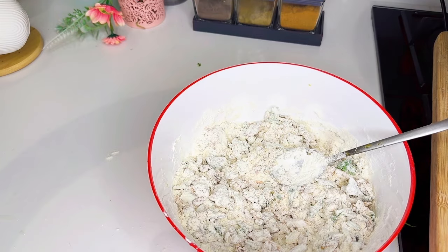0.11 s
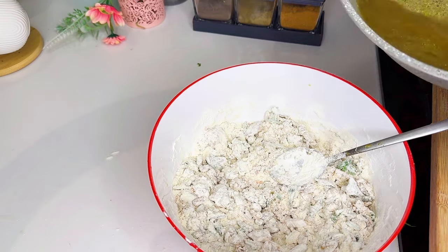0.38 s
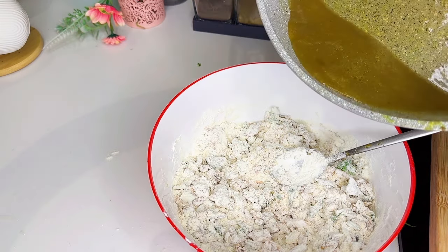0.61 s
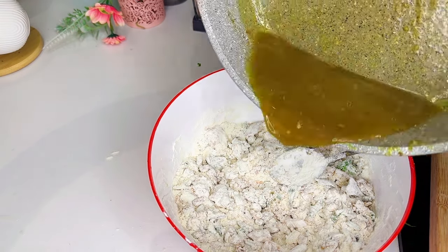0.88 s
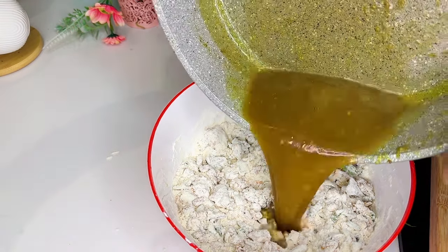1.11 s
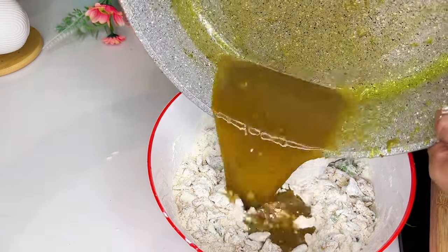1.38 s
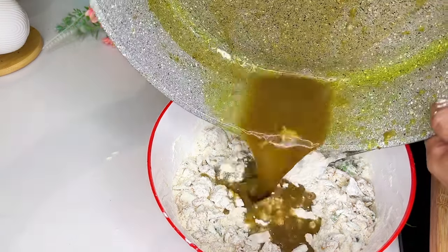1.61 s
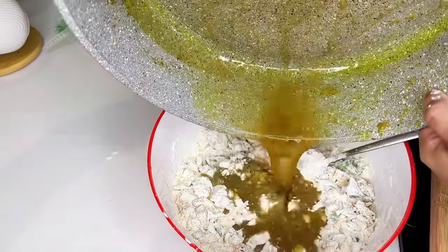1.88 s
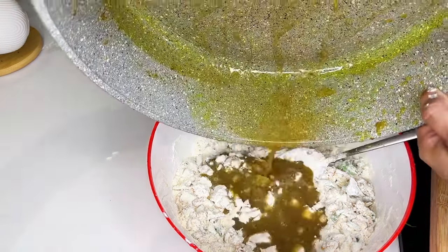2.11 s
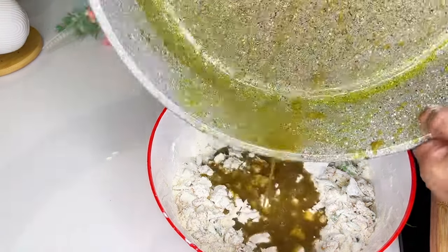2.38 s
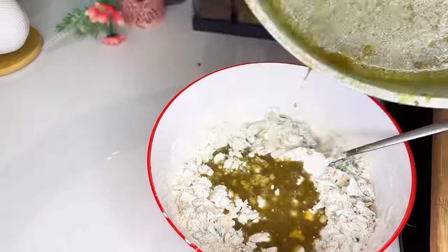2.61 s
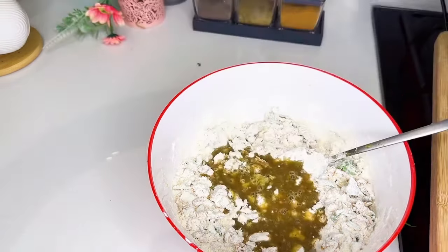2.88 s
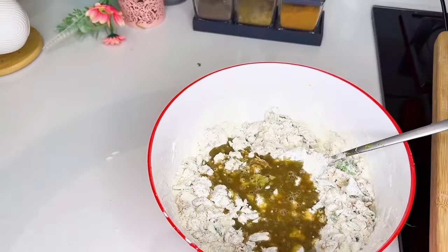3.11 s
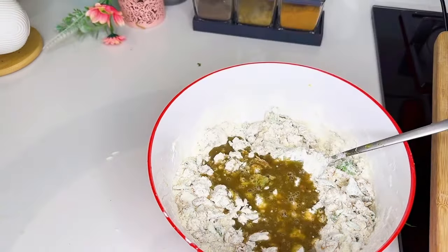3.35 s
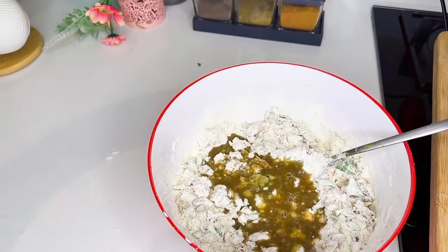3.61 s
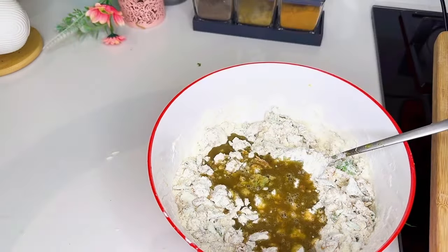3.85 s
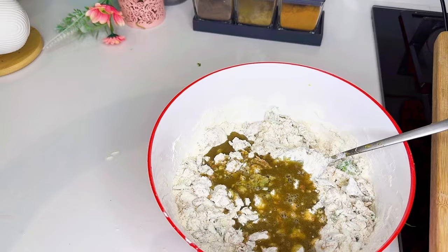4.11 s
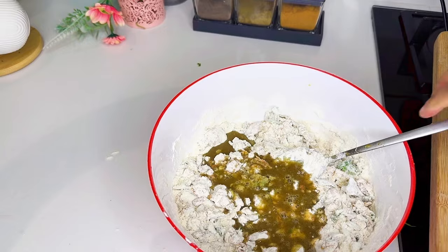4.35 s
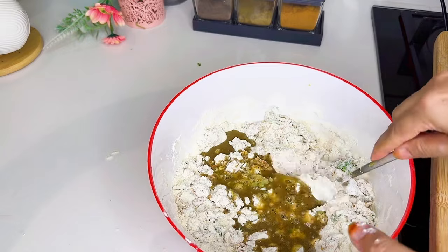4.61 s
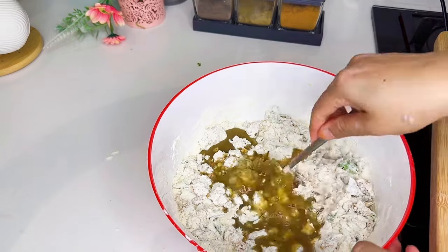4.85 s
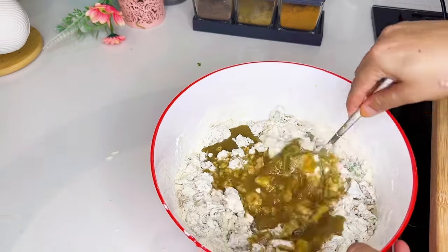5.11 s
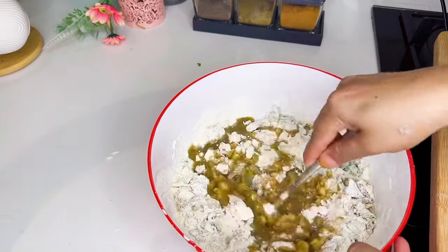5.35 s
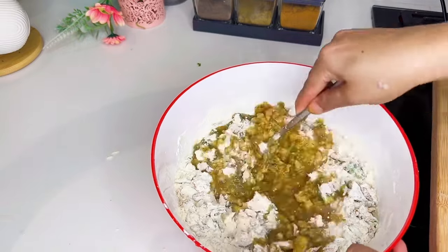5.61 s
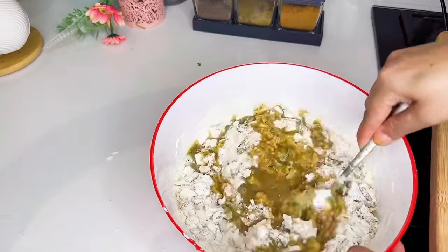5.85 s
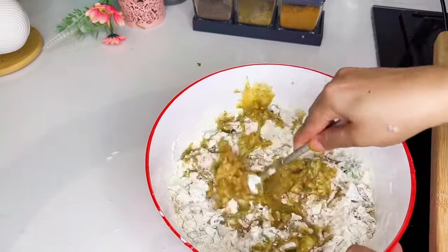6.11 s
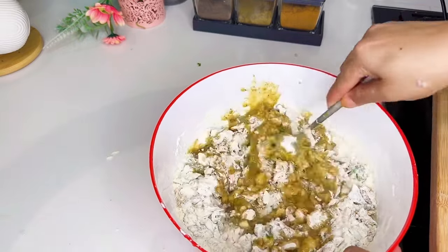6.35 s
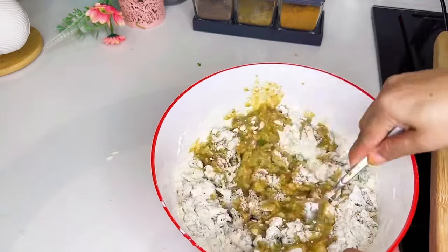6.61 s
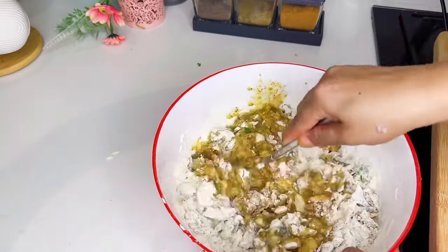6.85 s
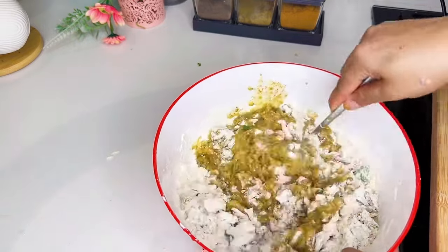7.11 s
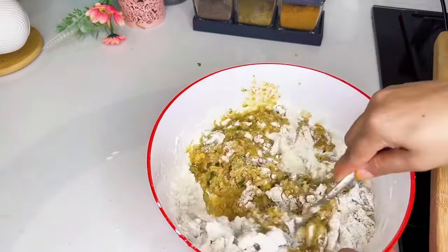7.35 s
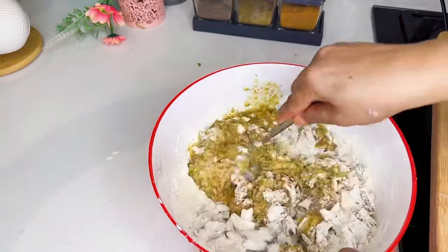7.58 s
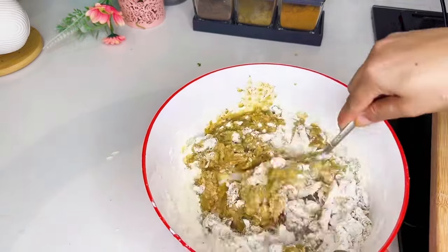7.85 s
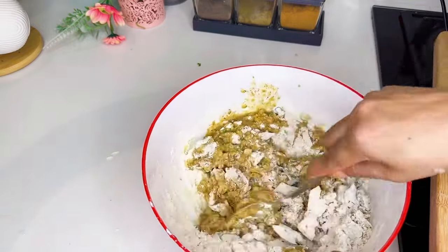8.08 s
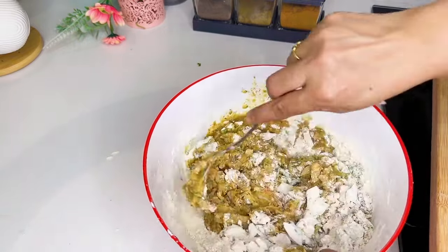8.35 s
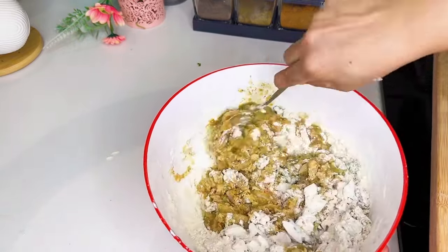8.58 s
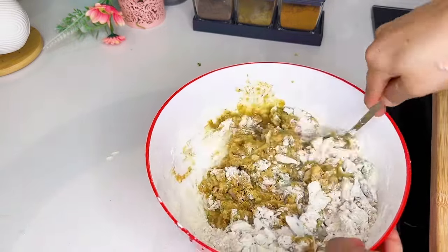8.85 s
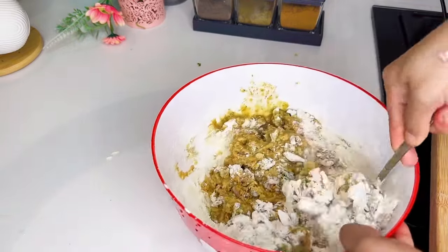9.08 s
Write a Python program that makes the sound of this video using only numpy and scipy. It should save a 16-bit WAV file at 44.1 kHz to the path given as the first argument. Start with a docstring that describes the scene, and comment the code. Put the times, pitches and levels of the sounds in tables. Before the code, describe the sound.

In a small hard-surfaced kitchen with a faint low appliance hum, liquid pours briefly into a bowl of crumbs with fine spatter, splats and little gurgles, thinning to drips. A heavy pan then clangs and rocks on a stovetop, much the loudest event. Afterwards a spoon stirs a sticky mix close to the microphone, squelching, scraping and snapping, with hollow knocks on the plastic bowl.

```python
"""First a kitchen hush with an appliance's hum; then thick broth is poured from a pan onto crumbs in a bowl.
The empty pan is set down on the hob and rocks; then a spoon turns the wet mix and knocks the plastic bowl.
Hum is wavering sines; liquid is many small bubbles and puffs of noise; the pan is a set of dying sines.
The bowl is noise through resonances. A small hard room answers the pouring, the pan and the spoon."""
import sys
import numpy as np
from scipy import signal
from scipy.fft import rfft, irfft, next_fast_len
from scipy.io import wavfile
from scipy.ndimage import map_coordinates

SR = 44100
rng = np.random.default_rng(int(sys.argv[2]) if len(sys.argv) > 2 else 0)


def inscribe(sig):
    """Save sig as 16-bit PCM at rate SR to the path in sys.argv[1].

    A 1-D sig is mono; a 2-D sig holds one channel per row.
    Samples are clipped to [-1, 1] before scaling.
    """
    pcm = np.round(np.clip(np.atleast_2d(sig).T, -1, 1) * 32767)
    wavfile.write(sys.argv[1], SR, pcm.astype(np.int16))


def undo_db(level):
    """Turn decibels back into plain size, where 20 dB means ten times bigger."""
    steps = np.asarray(level, float) / 20
    return 10 ** steps


N = 406373  # length in samples


def unit(x):
    """Scale to an rms of 1."""
    return x / np.sqrt(np.mean(x ** 2) + 1e-20)


def along(points, hz):
    """Read a curve of (frequency, value) points on a log frequency axis."""
    point_hz, value = np.transpose(points)
    return np.interp(np.log(hz + 1), np.log(point_hz + 1), value)


def levels(rows):
    """Turn each dB column into a gain per sample, at -120 dB outside the table."""
    seconds, *columns = np.transpose(rows)
    t = np.arange(N) / SR
    return [undo_db(np.interp(t, seconds, db, left=-120, right=-120)) for db in columns]


def filtered(x, response):
    """Filter x by multiplying its spectrum with a response given as a function of frequency."""
    size = 2 * next_fast_len(len(x) // 2 + SR // 8)  # spare room for the ringing
    spectrum = rfft(x, size) * response(np.fft.rfftfreq(size, 1 / SR))
    return irfft(spectrum, size)[:len(x)]


def resonances(modes):
    """Response of an object that favours a few pitches: (frequency, width, level) with alternating signs."""
    def response(hz):
        total = 0
        for k, (centre, width, db) in enumerate(modes):
            damping = 1j * hz * width
            total = total + (-1) ** k * undo_db(db) * damping / (centre * centre - hz * hz + damping)
        return total
    return response


def causal(spectrum):
    """Minimum-phase response of a (frequency, level) curve, so that nothing sounds before the blow."""
    def response(hz):
        cepstrum = irfft(np.log(undo_db(along(spectrum, hz))))
        half = len(cepstrum) // 2
        folded = np.r_[cepstrum[0], 2 * cepstrum[1:half], np.zeros(len(cepstrum) - half)]
        return np.exp(rfft(folded))
    return response


def coloured(x, spectrum):
    """Give x the tone colour of a (frequency, level) curve, at an rms of 1."""
    return unit(filtered(x, lambda hz: undo_db(along(spectrum, hz))))


def wobble(rate):
    """A smooth random curve with `rate` random points a second."""
    points = rng.standard_normal(int(N * rate / SR) + 4)
    return map_coordinates(points, [np.arange(N) * rate / SR])


def add(track, s, sound):
    """Mix a sound into the track at time s."""
    part = track[round(s * SR):][:len(sound)]
    part += sound[:len(part)]


def crackle(per_second, spread_db, life, bed):
    """Noise puffs at random times and of scattered size, each dying over `life` seconds, on a steady bed."""
    starts = rng.random(N) < per_second / SR
    sizes = starts * undo_db(spread_db * np.clip(rng.standard_normal(N), -2, 2))
    envelope = signal.lfilter([1], [1, -np.exp(-1 / (life * SR))], sizes)
    return (unit(envelope) + bed) * rng.standard_normal(N)


def puff(t60, colour):
    """One blow: a click, then noise that falls 60 dB in t60 seconds, filtered; peak 1."""
    t = np.arange(2048) / SR
    click = 2.35 * (t == 0)
    burst = filtered((rng.standard_normal(len(t)) + click) * undo_db(-60 * t / t60), colour)
    return burst / np.abs(burst).max()


def bubble(hz, cycles):
    """An air bubble: a soft-starting sine of a few cycles whose pitch climbs slightly."""
    u = np.arange(512) / SR * hz / cycles  # time, 1 at the loudest moment
    swell = np.e * u * np.exp(-u)
    return swell * np.sin(2 * np.pi * cycles * u * (1 + 0.012 * (u - 1)))


def swarm(span, count, low_hz, octaves, cycles, spread_db):
    """Many bubbles of scattered time, pitch and size, at an rms of 1 over their span."""
    out, (start, end) = np.zeros(N), span
    for when, pitch, size in rng.random((count, 3)):
        one = bubble(low_hz * 2 ** (octaves * pitch), cycles)
        add(out, start + when * (end - start), undo_db(spread_db * size) * one)
    return unit(out) * np.sqrt((end - start) * SR / N)


def ringing(modes, tilt_db):
    """Metal struck once: all its modes die away, each at a slightly random strength."""
    t = np.arange(SR // 2) / SR
    ring = np.zeros(len(t))
    for (hz, db, t60), chance_db in zip(modes, rng.normal(0, 1.5, len(modes))):
        start_db = db + chance_db + tilt_db * np.log2(hz / 1000)
        ring += undo_db(start_db - 60 * t / t60) * np.sin(2 * np.pi * hz * t)
    return ring * (1 - np.exp(-t / 0.00099))  # rounds off the very start


# colour of the hush in the room: (frequency [Hz], relative level [dB per Hz])
HUSH_COLOUR = [(15, -62), (25, -47), (49, -5), (102, -14), (134, -14), (236, -12), (256, -14), (326, -13),
               (624, -22), (677, -24.5), (2160, -33.5), (2480, -36.5), (3720, -38), (4870, -44.5),
               (16000, -48)]
# steady notes of the appliance's hum: (frequency [Hz], relative level [dB])
HUM = [(65.1, -61.5), (97.7, -58.5), (130.3, -53), (173.6, -58.5)]
# thin bands of appliance whine: (frequency [Hz], width [Hz], middle level [dB rms])
WHINE = [(2640, 160, -79.5), (3630, 450, -73.5)]


def room_tone():
    """Broad hush, a slightly wavering hum and two thin bands of noise as whine."""
    t = np.arange(N) / SR
    out = undo_db(-55) * coloured(rng.standard_normal(N), HUSH_COLOUR)
    for hz, db in HUM:
        gain = undo_db(db + 2 + 1.74 * wobble(6))
        out += gain * np.sin(2 * np.pi * hz * t + 0.82 * wobble(2.7))
    for hz, width, db in WHINE:
        band = unit(filtered(rng.standard_normal(N), resonances([(hz, width, 0)])))
        out += undo_db(db + 2.9 * wobble(8.1)) * band
    return out


# how long the room rings: (frequency [Hz], time to fall 60 dB [s])
KITCHEN = [(100, 0.81), (500, 0.95), (2000, 0.91), (6000, 0.79), (14000, 0.6)]


def kitchen(x):
    """The room's answer is a noise tail in which each frequency dies at its own speed."""
    hz, t, noise = signal.stft(rng.standard_normal(SR), SR, nperseg=256)
    fade = undo_db(-60 * t / along(KITCHEN, hz)[:, None])
    tail = signal.istft(noise * fade, SR, nperseg=256)[1]
    late = np.pad(x, (200, 0))  # the answer starts 200 samples after the sound
    return signal.fftconvolve(late, tail / np.linalg.norm(tail))[:N]


# colour of bright fizz, also used by the stirring: (frequency [Hz], relative level [dB per Hz])
FIZZ = [(3000, -12), (6000, -2), (15500, -1.5)]


def rustle():
    """A faint bright hiss swells and fades as the pan is carried off."""
    swell = np.exp(-((np.arange(N) / SR - 3.3) / 0.17) ** 2)
    return undo_db(-69) * swell * coloured(rng.standard_normal(N), FIZZ)


# colour of the fine spatter: (frequency [Hz], relative level [dB per Hz])
SPATTER = [(2940, -29), (5000, -22), (6130, -27), (7550, -5), (15500, 10.5)]
# strength of the stream: (time [s], relative level [dB])
FLOW = [(1.0, -75), (1.11, -64), (1.3, -65.5), (1.52, -61), (1.64, -67), (1.68, -70), (1.78, -52.5),
        (1.9, -63), (2.05, -64), (2.5, -60.5), (2.7, -76)]
# drops landing: (time [s], splat peak level [dB], bubble pitch [Hz], bubble level [dB])
DROPS = [(1.06, -46, 4150, -51), (1.1177, -39, 5600, -40), (1.192, -46, 3520, -61),
         (1.2184, -45, 1900, -59), (1.244, -41, 3020, -60), (1.3633, -39.5, 3860, -54),
         (1.4159, -34.5, 5100, -42), (1.465, -39, 4600, -47), (1.493, -32.5, 2860, -49),
         (1.5205, -37.5, 3230, -40), (1.5564, -41, 3280, -46), (1.6608, -38, 3270, -43),
         (1.6721, -22, 5500, -49), (1.7295, -41, 2780, -46), (1.758, -27, 4350, -37),
         (1.7877, -34, 4160, -53), (1.8033, -29, 4220, -38.5), (1.866, -37, 4600, -49),
         (1.895, -38, 4900, -41), (1.919, -29, 4930, -58), (2.0018, -42.5, 4320, -66),
         (2.0897, -41.5, 3170, -68), (2.2953, -47, 2200, -59), (2.33, -45, 3580, -66),
         (2.396, -46, 2610, -61), (2.4632, -37, 2890, -49.5), (2.503, -42, 3570, -66),
         (2.5845, -47, 1530, -66)]
# heavy slaps that also sound the bowl: (time [s], starting level [dB])
SLAPS = [(1.672, -35.5), (1.73, -40.5)]


def pour():
    """Fine spatter and a gurgle of bubbles follow the stream; larger drops splat and trap a bigger bubble."""
    flow, = levels(FLOW)
    start, end = FLOW[0][0], FLOW[-1][0]
    # around 1.88 s the stream breaks into drips and stops gurgling
    unbroken = 1 / (1 + np.exp((np.arange(N) / SR - 1.88) / 0.05))
    spatter = coloured(crackle(140, spread_db=16, life=0.0012, bed=0.53), SPATTER)
    gurgle = swarm((start, end), count=800, low_hz=2430, octaves=1.23, cycles=1.8, spread_db=14)
    out = undo_db(0.5) * flow * spatter + undo_db(2) * flow * unbroken * gurgle
    for s, splat_db, hz, bubble_db in DROPS:
        # smaller drops as the pan empties: splats brighten by 0.79 octaves a second
        splat_hz = 6740 * 2 ** (0.79 * (s - start))
        splat = puff(0.021, resonances([(splat_hz, 0.78 * splat_hz, 0), (2000, 2500, -8)]))
        add(out, s, undo_db(splat_db) * splat)
        add(out, s, undo_db(bubble_db) * bubble(hz, cycles=4.6))
    t = np.arange(1800) / SR
    for s, db in SLAPS:
        add(out, s, undo_db(db - 60 * t / 0.033) * np.sin(2 * np.pi * 740 * t))
    return out


# pan touching the hob:
# (time [s], clang peak level [dB], pan ring level [dB], grate ring level [dB], brightness [dB per octave])
LANDINGS = [(3.570, -10.5, -53, -18, 1), (3.586, -13.5, -35, -30, -2.5), (3.716, -4.5, -17, -26, -1.5),
            (3.755, -6, -23.5, -21.5, -3), (3.765, -15, -30, -37, -1), (3.800, -4, -23.5, -27, 2.5),
            (3.832, -12.5, -28.5, -40, 0)]
# notes of the pan: (frequency [Hz], relative level [dB], time to fall 60 dB [s])
PAN = [(550.4, -5.5, 0.32), (574, -0.5, 0.34), (833, -6, 0.11), (966, -3.5, .18), (1434, -2, .1),
       (1700, -8, 0.35), (2223, -9.5, 0.14), (2519, -9, .25), (2850, -10, .15), (3488, -14, .2),
       (4500, -7, 0.069), (5130, -16, .2), (6460, -23, .3), (7410, -29.5, .3)]
# notes of the iron grate under it: (frequency [Hz], relative level [dB], time to fall 60 dB [s])
GRATE = [(599, -3, 0.32), (1043, 4.5, 0.059), (1095, 0.5, 0.12), (1395, 0.5, .07), (2092, -4, 0.32),
         (2680, -7.5, .06), (3050, -15.5, .3), (3875, -6, .12), (4650, -18.5, .13), (5810, -25, 0.33),
         (7811, -29, 0.32), (8600, -30, 0.25), (9200, -30, .25), (10200, -34.5, .2)]
# colour of the clang, before brightness: (frequency [Hz], relative level [dB per Hz])
CLANG = [(100, -26.5), (300, -13), (1000, 1), (3000, -6.5), (6000, -16.5), (16000, -38.5)]


def pan():
    """Each contact rings pan and grate, clangs as a noise burst, and thuds into the hob as low sines."""
    out, t = np.zeros(N), np.arange(SR // 2) / SR
    thud = sum(level * np.sin(2 * np.pi * hz * t) for hz, level in [(81, 1), (50, 0.86), (172, 0.53)])
    thud = thud * (1 - np.exp(-t / 0.011))  # soft start
    for s, clang_db, pan_db, grate_db, tilt_db in LANDINGS:
        add(out, s, undo_db(pan_db) * ringing(PAN, tilt_db) + undo_db(grate_db) * ringing(GRATE, tilt_db))
        clang = [(hz, db + tilt_db * np.log2(hz / 1000)) for hz, db in CLANG]
        add(out, s, undo_db(clang_db) * puff(0.067, causal(clang)))
        thud_db = clang_db - 12 + 0.5 * tilt_db  # hard bright contacts carry more weight
        add(out, s, undo_db(thud_db - 60 * t / 0.13) * thud)
    return out


# single drags of the spoon, a minus fade swapping rise and fade:
# (time of peak [s], scrape level [dB], time to fade by 20 dB [s], wet fizz against scrape [dB])
DRAGS = [(4.44, -68, 0.26, -1), (4.7, -58, 0.02, -8), (4.85, -48.5, 0.05, -10), (4.96, -62, 0.08, 2),
         (5.251, -49, 0.03, -10), (5.378, -53, .1, -2.5), (5.53, -55.5, 0.06, -2.5),
         (5.629, -46, 0.0453, -5), (5.759, -49, 0.03, -7.5), (5.91, -60.5, 0.25, -1.5),
         (6.15, -63.5, 0.16, -5), (6.355, -51, 0.01, -9), (6.455, -44, 0.04, -11.5), (6.55, -45, 0.05, -9),
         (6.74, -50, 0.11, -8.5), (6.868, -42.5, 0.06, -12), (7.12, -46.5, 0.05, -11.5),
         (7.24, -45, 0.1, -9), (7.491, -49, 0.1, -3.5), (7.63, -44, 0.1, -8.5), (7.91, -40.5, -0.01, -17),
         (8.06, -48, 0.1, -6), (8.52, -57, 0.2, -2.5), (9.18, -52, 0.17, -13)]


def drags():
    """Gains of scrape and of wet fizz: every drag of the spoon swells and fades."""
    s, db, fade, wet_db = np.transpose(DRAGS)[:, :, None]
    t = np.arange(0, N + 64, 64) / SR
    # the rise takes 0.67 of the fade time; the power 1.44 rounds the top of the swell
    away = np.maximum((t - s) / fade, (s - t) / (0.67 * fade))
    scrape = undo_db(db - 20 * away ** 1.44)
    fizz = scrape * undo_db(wet_db)
    return [np.interp(np.arange(N) / SR, t, gain.sum(axis=0)) for gain in (scrape, fizz)]


# effort of the hand, heard as steady churning: (time [s], relative level [dB])
EFFORT = [(4.35, -68), (4.75, -67), (5.0, -68.5), (5.15, -65.5), (5.8, -67), (6.05, -55), (6.3, -66.5),
          (6.9, -59), (7.05, -60), (7.3, -56.5), (7.45, -66), (7.8, -61), (8.1, -58.5), (8.4, -88.5),
          (8.47, -76), (8.65, -54.5), (8.9, -57), (9.21, -69)]
# colour of the squelching scrape: (frequency [Hz], relative level [dB per Hz])
SQUELCH = [(530, -4), (900, 2.5), (1150, -7), (1460, -2.5), (2980, 1), (6000, -10.5), (7800, -24),
           (13200, -120)]
# snaps of the sticky mix: (time [s], peak level [dB], colour [Hz])
SNAPS = [(4.435, -41, 1680), (4.828, -29, 2220), (4.956, -37, 4650), (5.3795, -35, 5000),
         (5.5228, -43, 2970), (5.622, -36, 3000), (5.7446, -35.5, 1670), (5.9217, -29.5, 5200),
         (5.9748, -44, 2160), (6.1436, -39, 4000), (6.4365, -40, 2680), (6.76, -30.5, 11500),
         (6.8342, -34.5, 1500), (6.878, -43, 2870), (7.218, -35, 4690), (7.234, -27, 1870),
         (7.4772, -34, 2250), (7.5, -35.5, 2150), (7.6213, -24.5, 1910), (7.6965, -33, 2050),
         (7.883, -35, 1733), (7.9782, -36, 2290), (8.0242, -29.5, 2567), (8.107, -30, 3090),
         (8.208, -33.5, 8000), (8.522, -39, 3760), (8.599, -42, 9000), (9.1774, -37, 2410)]
# spoon knocking the bowl: (time [s], peak level [dB], strongest pitch [Hz], thump level [dB])
KNOCKS = [(4.822, -37, 229, -33), (5.698, -40, 975, -41.5), (6.348, -35, 660, -49),
          (6.712, -36.5, 681, -48), (6.871, -41, 861, -54), (6.934, -36.5, 318, -36.5),
          (7.112, -33, 755, -36), (7.232, -53, 708, -40), (7.317, -21.5, 412, -26), (7.411, -52, 412, -33),
          (7.509, -43, 441, -33.5), (7.654, -16, 350, -24.5), (7.705, -17.5, 560, -38),
          (7.903, -15, 490, -30), (8.441, -32.5, 458, -38), (8.63, -43, 299, -44)]
# resonances of the bowl: (frequency [Hz], width [Hz], relative level [dB])
BOWL = [(221, 47, -5.5), (333, 52, 0), (456.6, 37, 4), (560, 60, -3), (653, 44, -1), (761, 67, -2),
        (1076, 165, -11.5), (1680, 43, -10.5), (2160, 270, -16)]


def stir():
    """The spoon drags through sticky crumbs, which squelch, fizz and snap, and it knocks the bowl wall."""
    churn, = levels(EFFORT)
    drag, wet = drags()
    span = EFFORT[0][0], EFFORT[-1][0]
    # air pockets popping, and grains scraping
    pockets = swarm(span, count=2500, low_hz=1089, octaves=2.29, cycles=1.55, spread_db=15)
    grains = coloured(crackle(400, spread_db=1, life=0.0045, bed=0.15), SQUELCH)
    out = (churn + drag) * (0.41 * pockets + 0.77 * grains)
    # fizz, with strands of the mix tearing
    strands = swarm(span, count=260, low_hz=8000, octaves=0.9, cycles=2.2, spread_db=14)
    hiss = coloured(rng.standard_normal(N), FIZZ)
    out += (undo_db(-3.5) * churn + wet) * (0.99 * hiss + 0.37 * strands)
    # the bowl rumbles along
    rumble = unit(filtered(crackle(130, spread_db=6.5, life=0.0091, bed=0.27), resonances(BOWL)))
    out += (undo_db(1) * churn + undo_db(-10) * drag) * rumble
    for s, db, hz in SNAPS:
        band = resonances([(hz, 0.9 * hz, 0)])
        add(out, s, undo_db(db) * puff(0.01, lambda f: band(f) ** 2))
    t = np.arange(SR // 5) / SR
    edge = resonances([(1700, 2600, 0)])
    for s, db, hz, thump_db in KNOCKS:
        # the spot struck favours modes near its pitch
        struck = [(c, width, level - 4 * abs(np.log2(c / hz))) for c, width, level in BOWL]
        ring = filtered(puff(0.045, lambda f: 1), resonances(struck))
        add(out, s, undo_db(db) * ring / np.abs(ring).max())
        # steel edge on hard plastic
        add(out, s, undo_db(db - 13) * puff(0.015, lambda f: edge(f) ** 2))
        # the worktop under the bowl
        add(out, s, undo_db(thump_db - 60 * t / 0.14) * np.sin(2 * np.pi * 140 * t))
    return out


def scene():
    """All sources together; the pan lands farther off, so more of the room is heard with it."""
    near, bowl, far = pour() + rustle(), stir(), pan()
    echo = kitchen(undo_db(-9) * near + undo_db(-9) * bowl + undo_db(-4) * far)
    return (near + bowl + far + echo + room_tone())[None]


def low_pass(x):
    """Removes everything above the highest recorded frequency."""
    return signal.sosfilt(signal.butter(12, 17040, fs=SR, output="sos"), x)


def record(dry):
    """Loud peaks are softly rounded off and everything from 15750 Hz up drops by 24 dB."""
    soft = dry[0] / (1 + np.abs(dry[0] / 0.7) ** 4) ** 0.25
    dull = filtered(soft, lambda hz: np.where(hz < 15750, 1, undo_db(-24)))
    return low_pass(dull[None])


dry = scene()
out = record(dry)
inscribe(out)
```